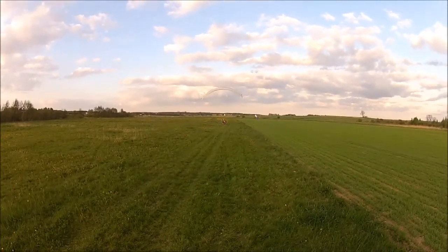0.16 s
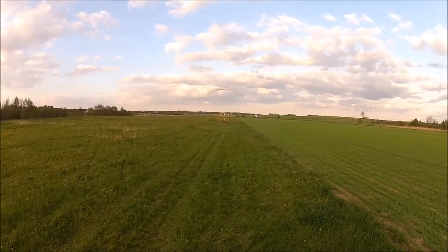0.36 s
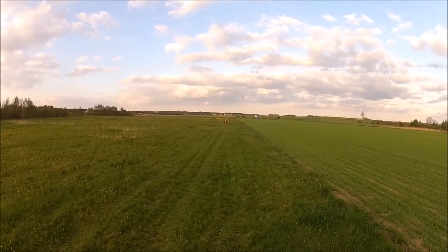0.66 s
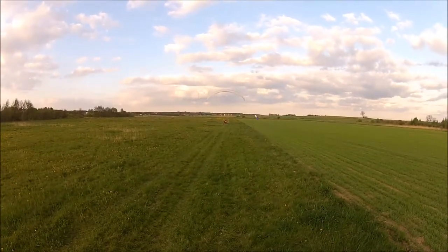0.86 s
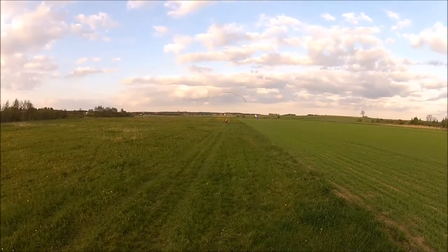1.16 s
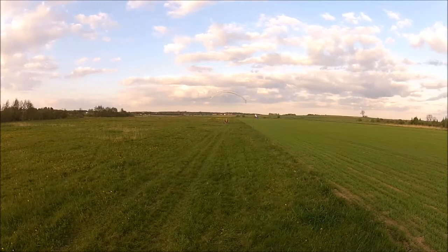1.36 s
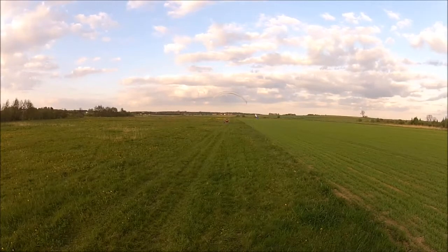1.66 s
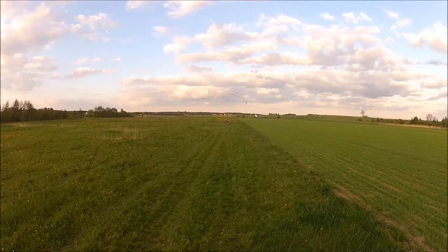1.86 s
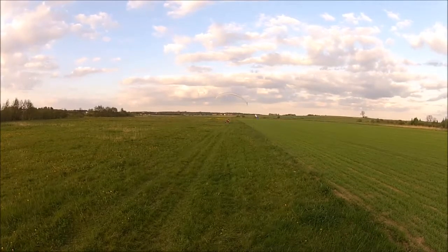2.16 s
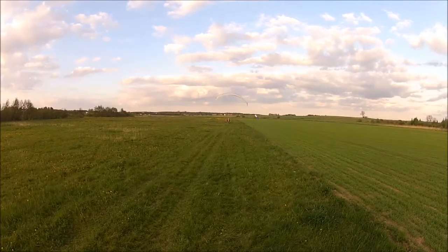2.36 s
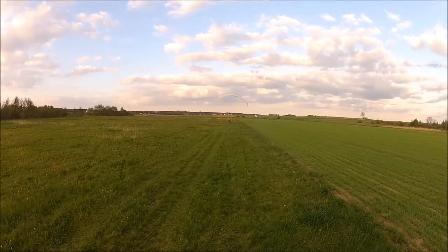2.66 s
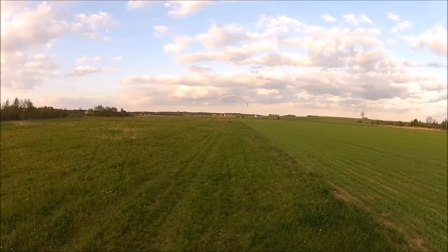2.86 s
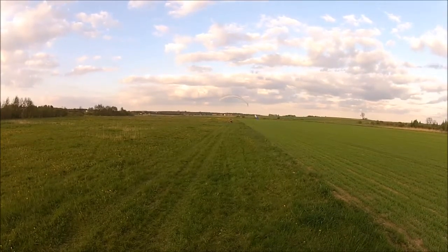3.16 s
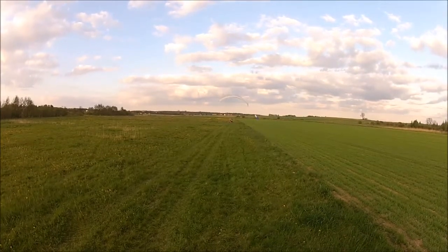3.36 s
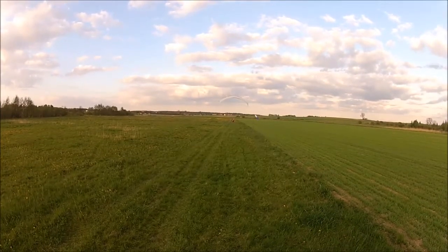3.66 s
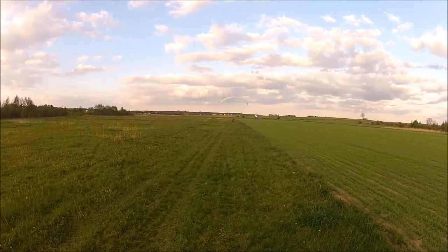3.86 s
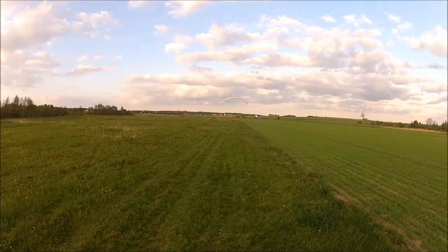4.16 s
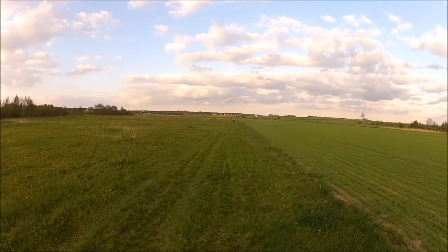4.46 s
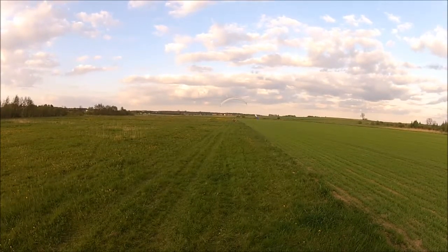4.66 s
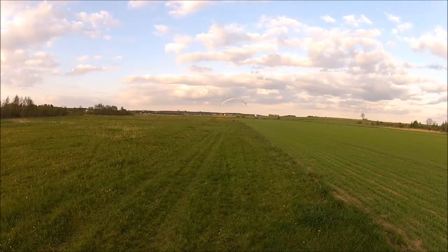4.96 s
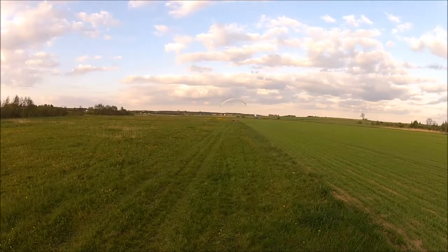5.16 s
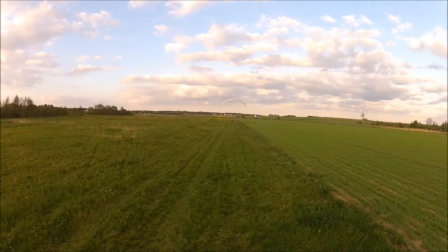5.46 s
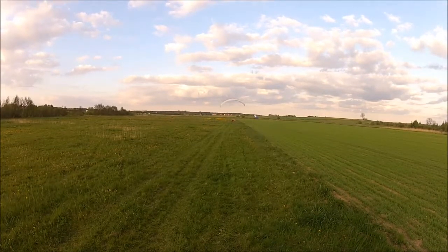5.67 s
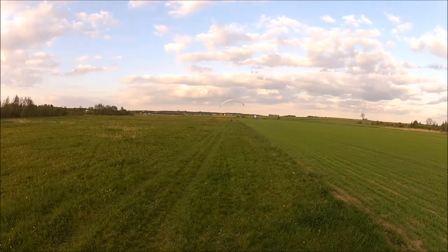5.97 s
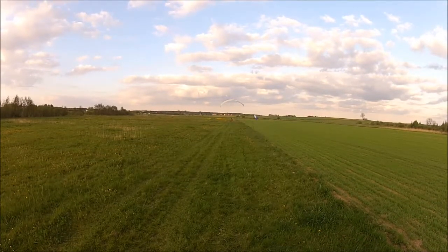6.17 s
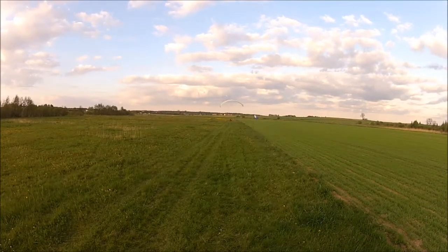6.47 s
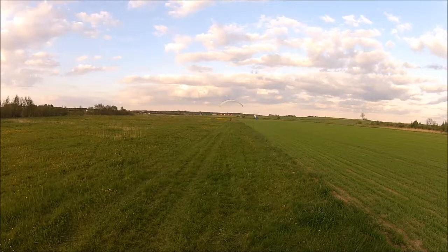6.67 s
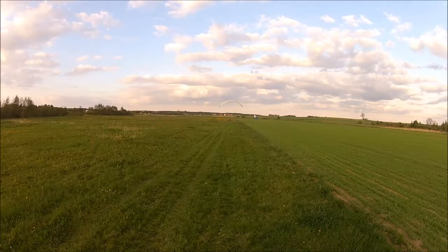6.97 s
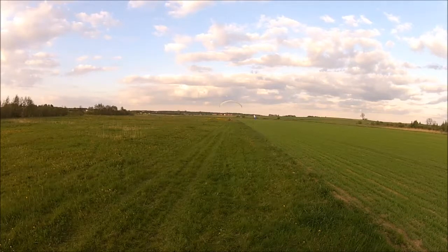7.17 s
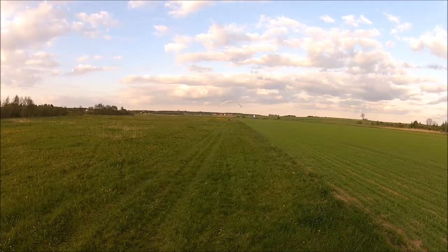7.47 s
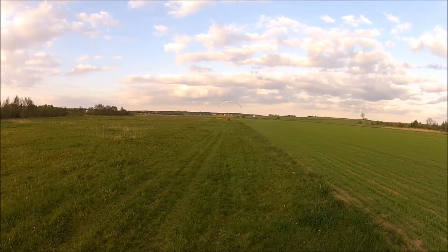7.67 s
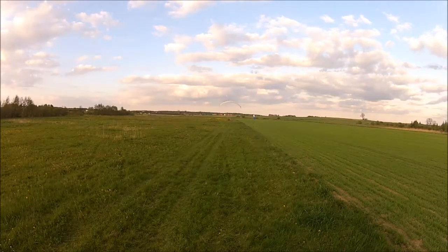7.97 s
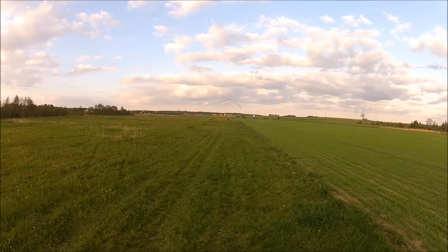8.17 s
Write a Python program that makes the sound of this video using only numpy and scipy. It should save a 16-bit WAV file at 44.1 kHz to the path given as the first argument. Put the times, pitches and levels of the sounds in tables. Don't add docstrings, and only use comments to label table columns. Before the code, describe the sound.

A small two-cylinder-like piston engine with propeller drones and rasps as it moves away over open grassland. It starts loud and hissy, sags in pitch and turns uneven, pops several times in the middle, then revs up again, more distant. Wind gusts thump the microphone; a few very faint bird chirps. Gritty, narrow outdoor sound with metallic false highs.

```python
import sys
import numpy as np
from scipy import signal
from scipy.fft import rfft, irfft
from scipy.io import wavfile
from scipy.ndimage import uniform_filter1d

SR = 44100
rng = np.random.default_rng(int(sys.argv[2]) if len(sys.argv) > 2 else 0)


def int16_out(signal):
    q = np.round(np.clip(np.atleast_2d(signal).T, -1, 1) * 32767)
    wavfile.write(sys.argv[1], SR, q.astype(np.int16))


def volts(x):
    e = np.asarray(x, float) / 20
    return 10 ** e


N = 366912
T = np.arange(N) / SR


def evened(x):
    return x / np.sqrt(np.mean(x ** 2) + 1e-20)


def read(points, hz):
    f, value = np.transpose(points)
    return np.interp(np.log(hz + 1), np.log(f + 1), value)


def curves(rows, t):
    s, *columns = np.transpose(rows)
    return [np.interp(t, s, c) for c in columns]


def bumps(rows, t):
    return sum(height * np.exp(-((t - s) / half) ** 2) for s, half, height in rows)


def drift(hz):
    coarse = uniform_filter1d(rng.standard_normal(N // 64 + 2), max(int(SR / 64 / hz), 1))
    return np.repeat(evened(uniform_filter1d(coarse, size=9)), 64)[:N]


def coloured(points):
    hz = np.fft.rfftfreq(N, 1 / SR)
    return evened(irfft(rfft(rng.standard_normal(N)) * volts(read(points, hz)), N))


def ring(x, hz, width):
    return signal.lfilter(*signal.iirpeak(hz, hz / width, SR), x)


def tones(turns, orders, waver_db, slip):
    out = 0
    turns = turns[::4]
    for k, db in orders:
        lag = 2.7 + 4.58 * np.arctan((k - 4.2) / 1.2)
        phase = 2 * np.pi * k * turns - lag + slip * np.sqrt(k) * drift(10.8)[::4]
        out = out + np.sqrt(2) * volts(db + waver_db * drift(7.9)[::4]) * np.cos(phase)
    return signal.resample_poly(out, 4, 1)[:N]


def puffs(turns, decay, base, spread_db, contrast_db):
    whole = turns.astype(int)
    size_db = spread_db * rng.standard_normal(1000)[whole] + contrast_db * (-1.) ** whole
    return evened(base + uniform_filter1d(volts(size_db) * np.exp(-(turns % 1) / decay), 40))


def exhaust_note(crank, blades, bang, note_db):
    # (multiple of the firing rate, level [dB])
    low_orders = [(1, -5.5), (2, -4), (3, 1)]
    half_orders = [(1.5, 7.5), (2.5, -26), (3.5, -4), (4.5, -1.5), (5.5, -14)]
    # (multiple of the blade rate, level [dB])
    blade_orders = [(1, -14), (2, -8.5), (3, -14.5), (4, -13.5), (5, -27.5), (6, -26), (7, -30.5)]
    # (time [s], half length [s], rise of half multiples [dB])
    stumbles = [(0.95, 0.25, 12.5), (1.33, .08, 7), (1.8, 0.039, 10), (2.2, 0.16, -2), (2.6, 0.13, -16),
                (3.6, 0.11, 8), (4.65, 0.22, 9), (5.4, .1, 3), (5.9, 0.15, 16.5), (6.9, 0.12, 8.5),
                (7.2, 0.064, 16.5), (7.9, 0.32, 12.5)]
    # (frequency [Hz], density [dB per Hz])
    rasp = [(500, -37), (750, 4), (1100, -6), (1500, -8), (2200, -23.5)]
    # (time [s], half length [s], change [dB])
    dips = [
        (1.33, 0.055, -3),
        (2.1, 0.087, -7),
        (3.6, .08, 0),
        (5.93, 0.17, -6),
    ]
    uneven_db = -17.5 + bumps(stumbles, T)
    low = tones(crank, low_orders, .5, .05) + tones(blades, blade_orders, 1.5, .08)
    low += volts(uneven_db - 2.5) * tones(crank, half_orders, 2.2, .15)
    low += volts(-24.5) * coloured(rasp) * bang
    return volts(note_db + bumps(dips, T)) * low


def upper_note(crank, rate, near_db):
    # (multiple of the firing rate, level [dB])
    upper_orders = [(4, 3.5), (5, 2.5), (6, -12.5), (7, -21), (8, -34), (14, -25), (18, -52), (19, -52),
                    (22, -31), (23, -49)]
    upper_db = -51.5 + 1.43 * near_db - 0.36 * (rate - 53)
    pipe = volts(2 * np.tanh((rate - 53.1) / 1.4))
    fourth = pipe * tones(crank, upper_orders[:1], 1.3, .1)
    others = tones(crank, upper_orders[1:], 1.3, .1) / pipe
    return volts(upper_db) * (fourth + others)


def propeller_roar(crank, blades, near_db, hiss_db):
    # (frequency [Hz], density [dB per Hz])
    roar_spectrum = [(190, -24), (330, -27.5), (387, -3.5), (444, -1.5), (618, 5), (710, -5.5),
                     (796, -12.5), (969, -30.5), (1500, -13), (1950, -38), (3300, -120)]
    # (multiple of the firing rate, level [dB])
    pipe_orders = [(9, -15), (10, -13), (11, -15), (12, -12)]
    # (multiple of the blade rate, level [dB])
    blade_mid = [(8, -14), (9, -13), (10, -11), (11, -12), (12, -18), (13, -20), (14, -21)]
    roar_db = -58 + 0.18 * near_db + 1.33 * drift(2.37)
    roar = volts(-1.0 + 0.43 * drift(23)) * coloured(roar_spectrum) * puffs(blades, 0.37, 3.4, 2.6, 0)
    middle = tones(crank, pipe_orders, 1.3, .06) + tones(blades, blade_mid, 1.3, .06)
    roar += volts(2.5 + .25 * (hiss_db + 58)) * middle
    return volts(roar_db) * roar


def exhaust_hiss(fired, blades, bang, lift_db, hiss_db, bright_db):
    # (frequency [Hz], density [dB per Hz])
    hiss_spectrum = [(590, -36), (1000, -12), (1180, -9.5), (1310, -5.5), (1730, -4.5), (1880, -2),
                     (2690, -11), (2910, -12.5), (3260, -14.5), (3430, -23.5), (4070, -13.5), (4580, -30.5),
                     (5900, -53), (7670, -75), (13000, -120)]
    # (frequency [Hz], width [Hz], level [dB])
    shell_modes = [(1842, 18, 4), (1929, 22, 2), (2850, 80, -3), (3148, 20, -2)]
    # (multiple of the blade rate, level [dB])
    blade_tips = [(15, -29), (16, -30), (17, -22), (18, -22), (19, -31), (21, -24), (22, -19), (23, -23),
                  (24, -23)]
    # (time [s], half length [s], change [dB])
    misses = [
        (0.806, 0.0068, -5),
        (1.39, 0.015, -8),
    ]
    miss_db = bumps(misses, T)

    air = coloured(hiss_spectrum)
    notch = signal.butter(2, (2350, 3400), "bandstop", fs=SR, output="sos")
    dull = signal.sosfiltfilt(notch, air)
    air = dull + volts(0.68 * bright_db + 3.5) * (air - dull)
    beat = bang + .3 * puffs(blades, .3, .3, 2, 0)

    shell = sum(volts(db) * ring(air * beat, hz, width) for hz, width, db in shell_modes)
    shell = 0.58 * shell / np.sqrt(uniform_filter1d(shell ** 2, size=2500) + 1e-9)
    hiss = evened(air * beat + shell * volts(-.5 * bright_db)) * volts(miss_db + .8 * drift(23))

    count = np.floor(fired)
    snaps = np.diff(count, prepend=1) * volts(lift_db * (-1.) ** count + 2 * drift(40) + miss_db)
    knock_band = signal.butter(3, (950, 2400), "bandpass", fs=SR, output="sos")
    hiss += volts(23) * signal.sosfilt(knock_band, snaps)
    hiss += volts(.5) * tones(blades, blade_tips, 1.3, .04)
    return volts(hiss_db) * hiss


def aircraft():
    # (time [s], firing rate [1/s])
    speed = [(0.0, 56.9), (0.36, 58.6), (1.2, 54.0), (1.4, 50.0), (1.6, 50.4), (1.97, 53.5), (2.25, 50.0),
             (2.85, 55.3), (3.35, 54.0), (3.5, 52.2), (4.25, 52.4), (4.95, 50.5), (5.25, 51.0),
             (5.52, 49.2), (6.1, 49.7), (6.7, 55.0), (7.45, 56.6), (8.32, 53.0)]
    # (time [s], note [dB], hiss [dB], brightness [dB])
    engine = [(0.0, -33.5, -51, 2), (0.25, -32.5, -53, 1.5), (0.7, -34.5, -52, 6), (1.0, -36, -51, 1.5),
              (1.27, -38.5, -52.5, -8), (1.4, -38.5, -57.5, -0.5), (2.1, -40.5, -64, -3.5),
              (2.4, -39.5, -59.5, -6.5), (3.1, -40.5, -65.5, 5), (4.0, -43, -68, 0), (4.7, -42.5, -65, -1),
              (5.6, -44, -67, -3), (5.95, -42.5, -58.5, -7.5), (6.35, -44, -56, 8), (6.8, -42.5, -56, 8.5),
              (7.05, -43, -53.5, -4), (7.9, -45, -52, -2), (8.32, -44.5, -62.5, -6)]
    # (time [s], half length [s], excess [dB])
    lifts = [
        (0.62, .1, 3),
        (1.12, .26, 7),
        (1.5, .07, 8),
        (4.95, .35, -7),
        (5.4, .15, -6),
        (5.9, .16, -9),
    ]
    note_db, hiss_db, bright_db = curves(engine, T)
    near_db = note_db + 40
    rate = uniform_filter1d(curves(speed, T)[0], size=4000)
    crank = np.cumsum(rate) / SR + .27
    fired = crank + 1.55
    blades = 1.0937 * crank

    lift_db = bumps(lifts, T)
    bang = puffs(fired, .3, .45, 1.2, .7 * lift_db)
    bang = bang + .05 * puffs(fired, .06, 0, 1.2, lift_db)
    return (exhaust_note(crank, blades, bang, note_db)
            + upper_note(crank, rate, near_db)
            + propeller_roar(crank, blades, near_db, hiss_db)
            + exhaust_hiss(fired, blades, bang, lift_db, hiss_db, bright_db))


def wind():
    # (frequency [Hz], density [dB per Hz])
    wind_spectrum = [(15, -30), (30, -3), (55, 5), (90, -6), (140, -6.5), (220, -15), (320, -22.5),
                     (500, -27.5), (800, -44), (1500, -100)]
    # (time [s], level [dB])
    breeze = [
        (0.0, -34.5),
        (0.9, -41.5),
        (1.6, -37.5),
        (2.4, -39.5),
        (3.5, -43),
        (5.5, -48.5),
        (6.6, -55),
        (7.3, -46.5),
        (8.32, -47),
    ]
    # (time [s], level above the breeze [dB])
    gusts = [(0.0, 1), (0.302, 2.5), (0.7, 13), (1.1, 12.5), (1.3, 2.5), (1.5, 5.5), (1.79, 6), (1.9, 4),
             (2.0, 2.5), (2.2, 6), (2.5, 2), (2.82, 2.5), (3.0, 3.5), (3.7, -1), (3.95, 1.5), (4.3, 1.5),
             (4.95, 5), (5.3, 4), (6.2, 8), (6.4, 5), (6.8, 6), (7.1, 16), (7.4, 5), (7.6, 3), (7.86, 8.5),
             (8.08, 7)]
    gust_half_s = 0.092
    frames, hz = N // 256 + 5, np.fft.rfftfreq(1024, 1 / SR)
    t = np.arange(frames) * 256 / SR
    breeze_db = curves(breeze, t)[0]
    extra_db = bumps([(s, gust_half_s, db) for s, db in gusts], t)
    gust_db = np.interp(T, t, breeze_db + extra_db)

    tilt_db = 4.5 - .4 * extra_db + 0.25 * (breeze_db + 45)
    octaves = np.log2(np.clip(hz, 60, 700) / 60)
    colour_db = read(wind_spectrum, hz)[:, None] + octaves[:, None] * np.minimum(tilt_db - 1.5, 1.6)
    a, b = rng.standard_normal((frames, 513, 2)).T
    buffet = signal.istft((a + 1j * b) * volts(colour_db), nperseg=1024, noverlap=768)[1][:N]
    buffet = buffet / np.sqrt(uniform_filter1d(buffet ** 2, size=4000) + 1e-12)
    return buffet * volts(gust_db + 1.5 + 1.5 * drift(35))


def microphone_hiss():
    # (frequency [Hz], density [dB per Hz])
    self_spectrum = [(590, -31), (1000, -8), (1440, -14), (1910, 6), (2660, -1.5), (2970, -3.5), (3530, -7),
                     (5240, -11), (5950, -18.5), (7740, -56), (13100, -120)]
    return volts(-66.5) * coloured(self_spectrum)


def pops():
    # (time [s], peak [dB], brightness [dB per octave], length [s])
    burns = [(1.757, -53, 1, 0.003), (1.794, -53, -2, 0.003), (1.994, -67, 1, 0.003),
             (2.39, -32, 0.5, 0.0046), (2.539, -34, 3, 0.0047), (3.653, -61, -3, 0.003),
             (3.839, -52, -3, 0.003), (3.947, -60, -0.5, 0.003), (4.028, -46, 1, 0.0033),
             (4.102, -42.5, 2, 0.0036), (4.182, -39.5, -5, 0.0042), (4.368, -46, -10, 0.0038),
             (4.421, -51, -5, 0.003), (4.469, -36, 2, 0.0022), (4.544, -37, 1.5, 0.003),
             (4.693, -35, 1.5, 0.0019), (5.005, -66, 2, 0.003), (7.716, -40, -11, 0.004)]
    # (frequency [Hz], width [Hz], level [dB])
    pipe_modes = [(380, 200, -6), (500, 120, -3), (690, 70, 3), (800, 110, 0), (1050, 200, -9),
                  (1400, 260, -13), (1950, 220, -12), (2400, 300, -15), (2850, 280, -14)]
    out, t = np.zeros(N + 3000), np.arange(3000) / SR
    muffle = signal.butter(6, 3200, fs=SR, output="sos")
    for s, db, tilt_db, length_s in burns:
        rough = rng.standard_normal(3000) * np.exp(-t / min(length_s, .004))
        burst = signal.sosfilt(muffle, rough + 16 * (t == 0))
        pop = 0
        for k, (hz, width, level_db) in enumerate(pipe_modes):
            mode = evened(ring(ring(burst, hz, hz / 2), hz, width))
            pop = pop + (-1) ** k * volts(level_db + tilt_db * np.log2(hz / 700)) * mode
        out[round(s * SR):][:3000] += volts(db) * pop / abs(pop).max()
    blur = ring(rng.standard_normal(3000), 700, 600) * np.exp(-t / .016) * (t > .004)
    out += volts(-7) * signal.oaconvolve(out, blur / np.linalg.norm(blur) / 3)[:len(out)]
    return signal.sosfilt(muffle, out[:N])


def bird():
    # (time [s], length [s], start [Hz], end [Hz], level [dB])
    chirps = [
        (3.78, .02, 5100, 5000, -78),
        (5.13, .08, 4800, 4700, -78),
        (5.295, .08, 4900, 4680, -73),
        (5.48, .055, 4800, 4780, -77),
    ]
    out = np.zeros(N)
    for s, length_s, start_hz, end_hz, db in chirps:
        t = np.arange(round(length_s * SR)) / SR
        warble = 1 + .5 * np.sin(2 * np.pi * 70 * t)
        whistle = signal.chirp(t, start_hz, length_s, end_hz)
        out[round(s * SR):][:len(t)] += volts(db) * np.hanning(len(t)) * warble * whistle
    return out


def scene():
    return (aircraft() + wind() + microphone_hiss() + pops() + bird())[None]


def low_pass(x):
    return signal.sosfilt(signal.butter(12, 16390, fs=SR, output="sos"), x)


def record(dry):
    low_cut = signal.butter(N=2, Wn=24, btype="high", fs=SR, output="sos")
    faded = dry * np.minimum(T / .0006 + .2, 1)
    slow = signal.resample_poly(signal.sosfilt(low_cut, faded), 40, 147, axis=1)
    held = signal.resample_poly(np.repeat(slow, 4, axis=1), 147, 160, axis=1)
    edge = signal.firwin(511, 15300, window=("kaiser", 9), fs=SR)
    cut = signal.oaconvolve(np.pad(held, ((0, 0), (0, 9)))[:, :N], edge[None], "same")
    return low_pass(cut)


dry = scene()
out = record(dry)
int16_out(out)
```